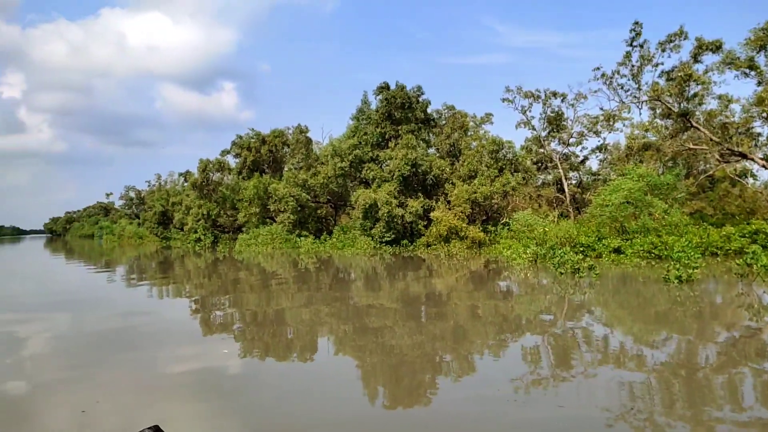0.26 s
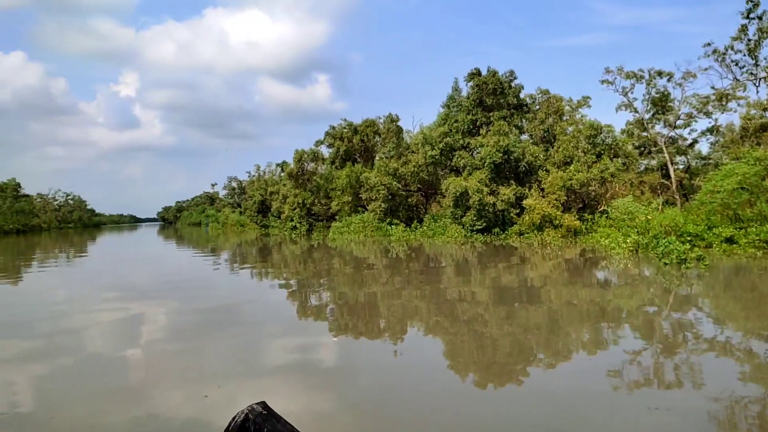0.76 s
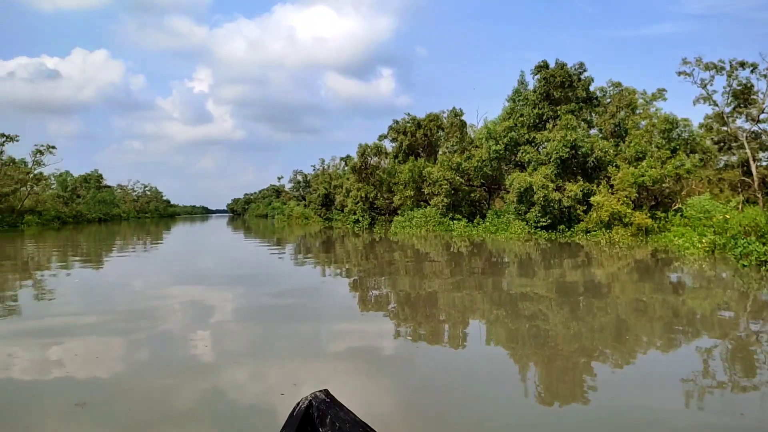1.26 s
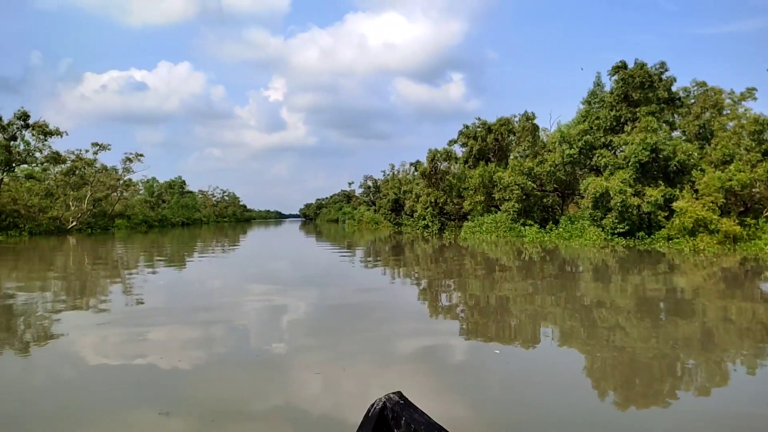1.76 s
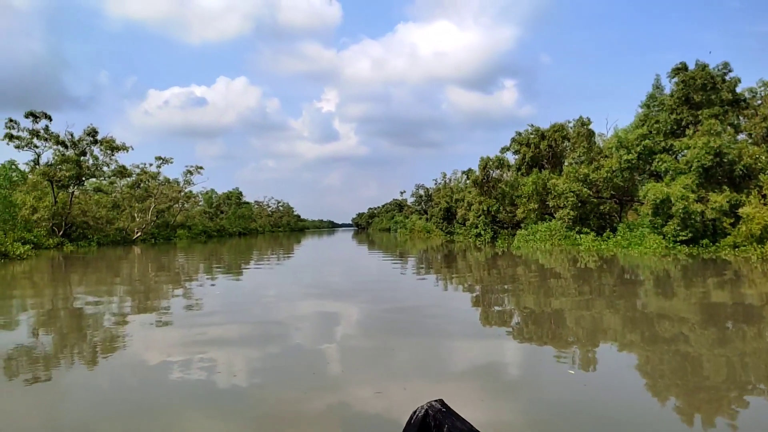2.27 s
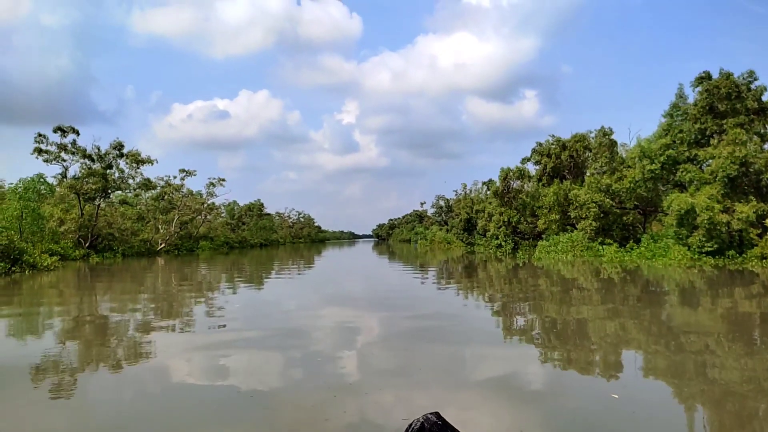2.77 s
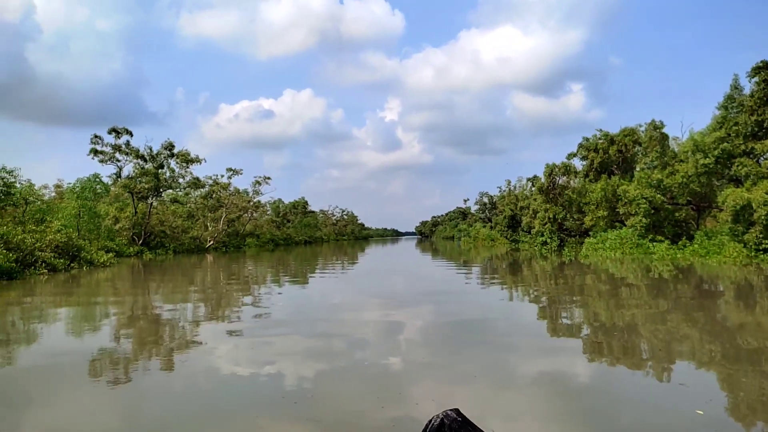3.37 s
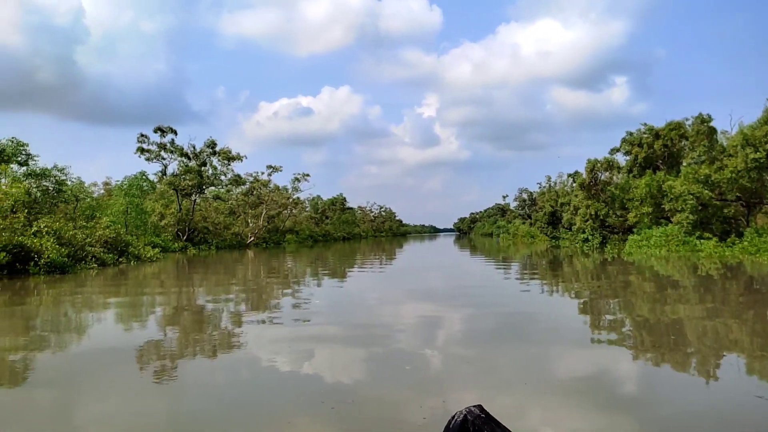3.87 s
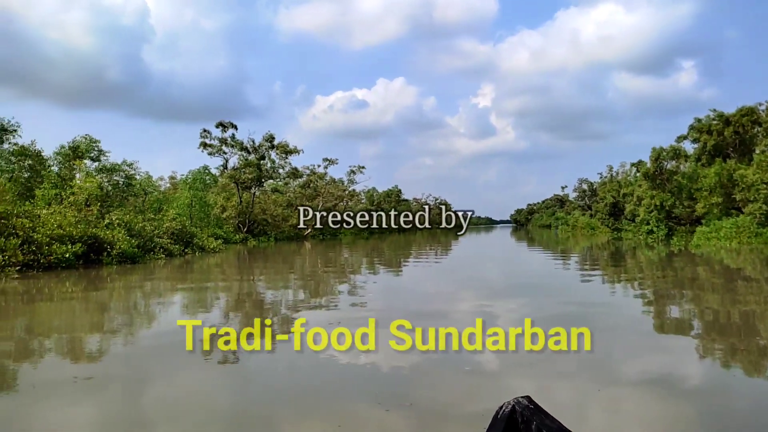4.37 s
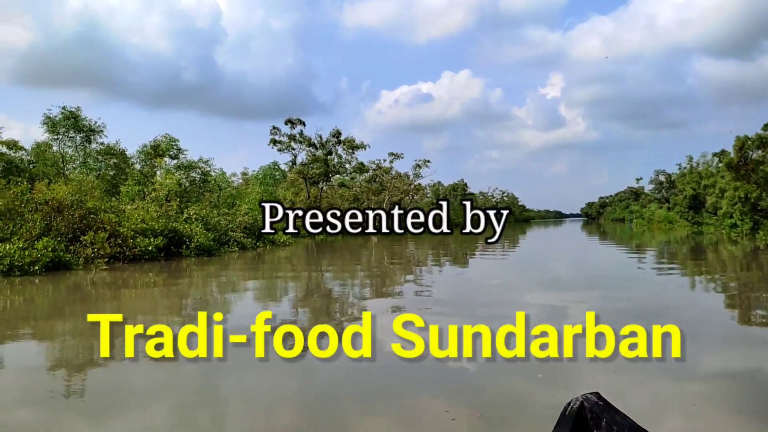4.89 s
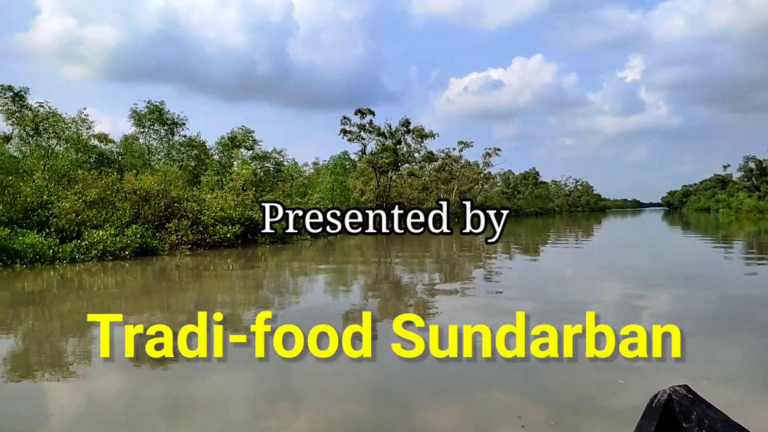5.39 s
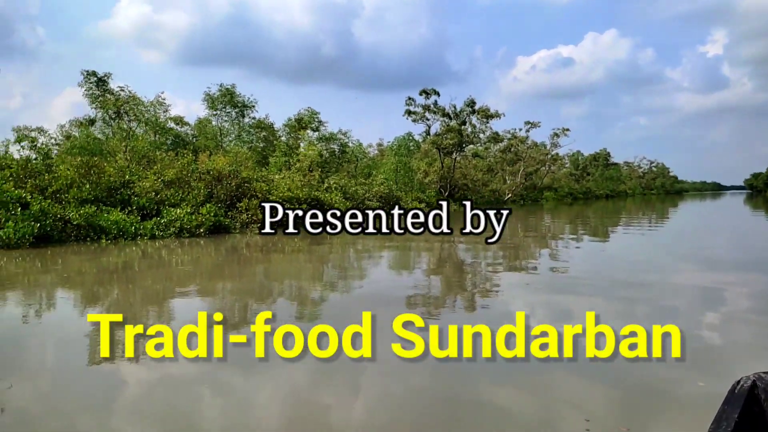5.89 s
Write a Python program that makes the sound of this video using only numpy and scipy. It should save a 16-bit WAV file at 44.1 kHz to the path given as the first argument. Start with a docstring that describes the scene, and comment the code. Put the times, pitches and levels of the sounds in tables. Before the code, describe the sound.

A phone held in a small wooden boat picks up dull rumbling flow and soft lapping beneath everything. Early drops ring, one strong woody thud comes at two seconds with bubbling behind the oar, then several knocks tumble together at three. The water settles while distant birds whistle and chatter, and dry insect ticks come in short bouts. Softer double thumps close the scene, outdoors with light echo from the trees.

```python
"""Oars knock the planks of a wooden rowboat on a quiet mangrove creek, heard from a phone inside the hull.
Each knock is a set of hull modes that throw short packets and ring on, with a slap of noise at the contact.
Water along the hull is patchy filtered noise; gurgles and drips are ringing bubbles of rising pitch.
Birds call from both banks as gliding sines with echoes; insects tick, hiss and buzz, all shaped noise."""
import sys
import numpy as np
from scipy import signal
from scipy.fft import rfft, irfft, next_fast_len
from scipy.io import wavfile
from scipy.ndimage import uniform_filter1d, map_coordinates

SR = 44100
rng = np.random.default_rng(int(sys.argv[2]) if len(sys.argv) > 2 else 0)


def to_wav(sig):
    """Store sig (one row per channel, or 1-D mono) as 16-bit WAV at the path in sys.argv[1].

    Samples outside -1..1 are clipped; the rate is SR.
    """
    pcm = np.clip(np.atleast_2d(sig), -1, 1) * 32767
    pcm = np.round(pcm).astype(np.int16)
    wavfile.write(sys.argv[1], SR, pcm.T)  # frames by channels


N = 270774

# Places where the oar meets the hull, named by the blows. Columns: drive of the modes of
# keel_db, belly_db, thwart_db, plank_db, rail_db, edge_db
GUNWALE = (-2.5, -11.5, -26, -1, -22.5, -22.5)
RIB = (-2.5, -4, -3, -7.5, -18.5, -33)
SIDE = (-14.5, -0.5, -11.5, -12.5, -31, -47)
SEAT = (-8, 2.5, -0.5, -11.5, -34.5, -33)
# Hiss and chatter wash from the banks, relative levels. Columns: time_s, insect_chorus_db, chatter_wash_db
HISS = [(0.0, -70, -59), (0.27, -70.5, -85), (1.06, -71, -85), (1.32, -64, -78.5), (2.22, -72, -80),
        (2.74, -71, -66.5), (2.94, -74.5, -76), (3.38, -72.5, -83), (3.64, -69, -63.5), (4.1, -73, -68.5),
        (6.14, -67.5, -83.5)]


def amp(db):
    """Decibels to a linear gain."""
    return 10 ** (np.asarray(db) / 20)


def unit(x):
    """Scale a signal to an rms of 1."""
    return x / np.sqrt(np.mean(x ** 2) + 1e-20)


def curves(rows):
    """One value per sample for each column after the time."""
    s, *cols = np.transpose(rows)
    return [np.interp(np.arange(N) / SR, s, c) for c in cols]


def wobble(rate):
    """A smooth random curve, rate knots a second."""
    return map_coordinates(rng.standard_normal(int(N * rate / SR) + 4), [np.arange(N) * rate / SR])


def swells(rows, rise_s, fade_s):
    """Gain of (start_s, hold_s, level_db) rows: each rises, holds and fades by 60 dB in fade_s."""
    t = np.arange(N) / SR
    total = np.zeros(N)
    for start, hold, db in rows:
        rise = np.clip(1 + (t - start) / rise_s, 0, 1) ** 2  # full at start
        total += rise * amp(db - 60 * np.maximum(t - start - hold, 0) / fade_s)
    return total


def filtered(x, response):
    """x times a response of frequency."""
    m = next_fast_len(N + SR // 2)
    return irfft(rfft(x, m) * response(np.fft.rfftfreq(m, 1 / SR)), m)[..., :N]


def rush(spectrum, patchy_db):
    """Noise of rms 1, shaped by (Hz, relative dB) rows, with patches of random gain in time and pitch."""
    z = signal.stft(rng.standard_normal(N), nperseg=512)[2]
    field = uniform_filter1d(uniform_filter1d(rng.standard_normal(z.shape), 5, 0), 10, 1)
    noise = signal.istft(z * amp(patchy_db * unit(field)), nperseg=512)[1][:N]
    f, db = np.transpose(spectrum)
    return unit(filtered(noise, lambda hz: amp(np.interp(np.log(hz + 1), np.log(f), db, -120, -120))))


def add(track, s, sound):
    """Mix a sound in at time s."""
    part = track[max(round(s * SR), 0):][:len(sound)]
    part += sound[:len(part)]


def tone(hz, gain):
    """A sine that follows a pitch curve."""
    return gain * np.sin(2 * np.pi * np.cumsum(hz) / SR)


def bubble(hz, cycles, rise):
    """An air pocket rings briefly while its pitch climbs."""
    u = np.arange(int(4 * cycles * SR / hz)) * hz / SR / cycles
    return tone(hz * (1 + rise * u), np.exp(-1.6 * u) * (1 - np.exp(-14 * u)))


def chatter_wash():
    """Chatter echoing off the banks, as a narrow band of patchy noise."""
    wash_db = curves(HISS)[1]
    return amp(wash_db - 7) * rush([(3500, -14), (4000, -1), (4500, .3), (4900, -18)], patchy_db=2.5)


def chatter_blur():
    """Many short rising strokes that blur together, at a level that follows the chatter wash."""
    out, u = np.zeros(N), np.linspace(0, 1, SR // 45)
    for when, pitch, size in rng.random((450, 3)):
        from_hz = 2800 + 1350 * pitch ** .4
        add(out, when * N / SR, tone(from_hz + 450 * u, amp(7.1 * size) * np.sin(np.pi * u)))
    return amp(curves(HISS)[1] - 5) * unit(out)


def insect_chorus():
    """A high, narrow insect hiss with a restless level."""
    chorus_db = curves(HISS)[0] + 1.2 * wobble(50)
    return amp(chorus_db) * rush([(5600, -16), (6000, 0), (7000, .3), (7700, -2)], patchy_db=1.5)


def tick_list():
    """Single insect ticks, and bouts of ticking at an uneven pace: (start_s, level_db)."""
    # Single insect ticks, levels relative. Columns: start_s, level_db
    single = [(0.009, -45), (0.0319, -51.5), (0.048, -47.5), (0.062, -45), (0.1311, -41.5), (0.1511, -47),
              (0.19, -36), (0.2047, -43.5), (0.6215, -43), (0.6401, -46.5), (0.6818, -51), (0.6978, -46),
              (0.7442, -53.5), (0.7572, -47.5), (0.7741, -47), (1.2625, -45), (1.284, -47.5),
              (1.3084, -53.5), (1.3508, -58.5), (1.381, -44.5), (1.6829, -52.5), (1.734, -42),
              (1.8242, -46.5), (1.966, -45.5), (2.6719, -54), (2.71, -54.5), (2.7257, -46), (2.795, -49.5),
              (2.8064, -50.5), (3.3837, -54.5), (3.4044, -47.5), (3.4427, -46), (3.4735, -49.5),
              (3.501, -52), (4.1668, -53), (4.1984, -50.5), (4.2172, -48.5), (4.2448, -50), (4.2757, -50),
              (4.2862, -47), (4.758, -43), (5.0936, -44), (5.5762, -53.5), (5.5962, -51), (5.6266, -54),
              (5.679, -43), (5.6907, -46.5)]
    # Bouts of ticking, levels relative. Columns: start_s, length_s, level_db
    bouts = [(0, 0.23, -47), (0.623, 0.14, -49), (1.236, .15, -47), (1.67, .15, -51), (1.922, .15, -52),
             (2.661, .16, -54), (3.377, .14, -46.5), (4.156, .14, -48), (4.846, 0.16, -49),
             (5.533, .15, -47)]
    gap_s, scatter_db = .024, 0.5  # mean gap in a bout, spread of level either way
    in_bouts = []
    for start, length, db in bouts:
        for k, (when, size) in enumerate(rng.random((12, 2))):
            if k * gap_s < length:
                in_bouts.append((start + (k + when) * gap_s, db + scatter_db * (2 * size - 1)))
    return list(single) + in_bouts


def insect_ticks():
    """Each tick is a fast-fading puff of noise through a high mode and a weaker lower one."""
    out, t = np.zeros(N), np.arange(SR // 40) / SR
    high_mode = signal.butter(1, [5700, 7500], "bandpass", fs=SR, output="sos")
    low_mode = signal.butter(1, [4300, 5500], "bandpass", fs=SR, output="sos")
    fade = amp(-60 * t / 0.0014) + amp(2.5 - 60 * t / 0.023)
    for s, db in tick_list():
        puff = rng.standard_normal((2, len(t))) * fade
        high = signal.sosfilt(high_mode, puff[0])
        low = signal.sosfilt(low_mode, puff[1])
        add(out, s - .0005, amp(db) * (high + amp(-20) * low))
    return out


def insect_buzz():
    """A pulsed insect buzz: noise in two bands, about 75 pulses a second."""
    # The buzzes. Columns: start_s, hold_s, level_db
    buzzes = [(.3, 0.34, -61.5), (1.3, .16, -60.5)]
    pulse_hz = 75 + 6 * wobble(10)
    pulse = (.5 + .5 * np.sin(2 * np.pi * np.cumsum(pulse_hz) / SR)) ** .8
    noise = rush([(1250, -27.5), (1480, -2.5), (1750, -15), (2050, 0.0), (2400, -10)], patchy_db=0.5)
    return swells(buzzes, rise_s=0.039, fade_s=0.45) * unit(pulse * noise)


def warbler():
    """Sines that climb steeply to a held top, and others that fall and level out."""
    # Rising notes, levels relative. Columns: start_s, top_hz, level_db
    hooks = [(0.379, 3850, -54), (0.537, 3740, -54), (0.583, 3425, -49), (0.965, 3880, -49.5),
             (1.015, 3484, -47.5), (1.12, 3830, -52.5), (1.199, 3360, -48.5), (1.528, 3780, -51.5),
             (1.611, 3400, -51), (1.688, 3780, -54), (1.949, 3370, -54.5), (2.124, 3770, -57),
             (2.492, 3820, -59.5), (2.653, 3800, -59.5), (2.883, 3500, -61.5), (3.085, 3830, -60),
             (3.286, 3480, -61.5), (3.508, 3850, -54.5), (3.734, 3390, -56), (4.033, 3360, -56.5),
             (4.104, 3850, -56), (4.266, 3480, -52.5), (4.794, 3830, -55), (4.849, 3450, -46),
             (5.255, 3460, -48.5), (5.355, 3870, -51.5), (5.652, 3380, -50), (5.76, 3820, -50.5),
             (5.955, 3350, -55)]
    # Loudness along a rising note. Columns: time_s, level_db
    hook_shape = [(0, -7), (.012, -4), (.022, 0), (.031, -1), (.039, -17)]
    # Level of the climb, by the note's place in the scene. Columns: start_s, level_db
    climb_level = [(3.4, 0), (3.5, -9)]
    # Falling notes. Columns: start_s, level_db
    dips = [(.559, -60), (.992, -56), (1.174, -51.5), (1.591, -52.5), (1.929, -52.5), (2.174, -55),
            (2.86, -62), (3.266, -62), (4.243, -59)]
    out = np.zeros(N)
    s, shape_db = np.transpose(hook_shape)
    t = np.arange(int(s[-1] * SR)) / SR
    below = 1e5 * np.maximum(.019 - t, 0)  # Hz under the top
    edges = signal.windows.tukey(len(t), .2)
    for start, top_hz, db in hooks:
        hz = top_hz - uniform_filter1d(below, size=520, mode="nearest")
        climb_db = np.interp(start, *np.transpose(climb_level)) * np.clip(below / 500, 0, 1)
        gain = amp(db + 2.5 + climb_db + np.interp(t, s, shape_db)) * edges
        add(out, start, tone(hz, gain * np.clip((hz - 2050) / 200, 0, 1)))  # silent under 2050 Hz
    u = np.linspace(0, 1, int(0.029 * SR))
    for start, db in dips:
        add(out, start, tone(2150 + 1350 * (1 - u) ** 1.6, amp(db) * np.sin(np.pi * u) ** 0.11))
    return out


def chatter_strokes():
    """The chatter spelled out as rising glides: (start_s, length_s, from_hz, to_hz, level_db)."""
    # Chattering bird, one row a syllable. Columns: start_s, upper_voice_db, lower_voice_db, last_stroke_top_hz
    syllables = [(3.565, -61, -63, 2800), (3.689, -59, -56.5, 3160), (3.822, -62, -60, 3200),
                 (3.976, -65, -56, 3400), (4.124, -68, -54, 3700), (4.285, -69, -54.5, 3940),
                 (4.444, -78, -55, 4050), (4.604, -78, -55, 4000), (4.781, -70, -54, 3630)]
    # Strokes of the upper voice, levels relative. Columns: delay_s, length_s, from_hz, to_hz, level_db
    upper = [(0, .018, 3810, 4530, -3), (.021, .024, 3910, 4530, 4.5)]
    # First stroke of the lower voice, level relative. Columns: delay_s, length_s, from_hz, to_hz, level_db
    lower = [(.004, .024, 3177, 3676, 0)]
    last_delay_s, last_from_hz, last_hz_per_s = .031, 2500, 36000
    rows = []
    for s, upper_db, lower_db, top_hz in syllables:
        last = (last_delay_s, (top_hz - last_from_hz) / last_hz_per_s, last_from_hz, top_hz, 0)
        for voice, db in ((upper, upper_db), (lower + [last], lower_db)):
            for delay, length, from_hz, to_hz, part_db in voice:
                rows.append((s + delay, length, from_hz, to_hz, db + part_db))
    return rows


def glides(rows):
    """Whistled sines from one pitch to another, with soft ends."""
    out = np.zeros(N)
    for start, length, from_hz, to_hz, db in rows:
        u = np.linspace(0, 1, int(length * SR))
        bend = 1 - (1 - u) ** 2.2 if from_hz > 1.2 * to_hz else u  # wide falls level out at the end
        hz = from_hz + (to_hz - from_hz) * bend
        add(out, start, tone(hz, amp(db) * np.sin(np.pi * u) ** 0.41))
    return out


def chattering_bird():
    """Rising strokes, each trailed by a weaker, lower voice."""
    rows = chatter_strokes()
    out = glides(rows)
    for start, length, from_hz, to_hz, db in rows:
        u = np.linspace(0, 1, int(length * SR))
        trail = amp(db - 7) * np.sin(np.pi * u)
        add(out, start + 0.024, tone(.86 * (from_hz + (to_hz - from_hz) * u), trail))
    return out


def other_birds():
    """Single glides of other birds."""
    # Glides. Columns: start_s, length_s, from_hz, to_hz, level_db
    single = [(0, .041, 4970, 3770, -60), (.108, 0.019, 6080, 6970, -57), (0.157, 0.018, 7400, 7000, -52),
              (1.1, 0.03, 6340, 7070, -57.5), (1.17, 0.033, 6820, 6350, -55),
              (1.192, 0.036, 6270, 6220, -59.5), (1.397, 0.043, 6950, 6600, -62),
              (1.432, 0.027, 6630, 6490, -52.5), (1.903, 0.077, 5980, 4800, -67.5),
              (3.62, .062, 6950, 6420, -59.5), (3.678, .066, 6500, 5800, -57.5),
              (4.657, 0.023, 3500, 2910, -52), (4.966, 0.035, 3610, 3790, -53.5),
              (4.967, 0.023, 3330, 2800, -51.5), (5.042, 0.04, 2550, 2290, -57),
              (5.246, 0.022, 4300, 2830, -59), (5.247, .024, 2190, 2290, -52.5),
              (5.351, 0.022, 2360, 2490, -54.5), (5.48, 0.051, 4800, 3200, -66),
              (5.536, 0.055, 4750, 2900, -57.5), (5.64, 0.024, 2330, 2250, -47.5),
              (5.934, 0.01, 1364, 1704, -44), (5.937, 0.039, 2650, 2140, -53.5)]
    return glides(single)


def reedy_bird():
    """Arched calls built of a pitch and its multiples, the second strongest."""
    # Calls, levels relative. Columns: start_s, level_db, extra_db of the multiples above the second
    squeaks = [(2.178, -45.5, 3), (5.857, -44, 6)]
    # Course of a call before smoothing. Columns: time_s, pitch_hz, level_db
    arch = [(0, 1284, -4), (.01, 1780, -8), (0.016, 1766, -5.5), (.032, 1769, 0), (.05, 1350, -7.5),
            (.06, 1040, -11)]
    # Partials. Columns: multiple of the pitch, level_db
    reed = [(1, -5), (2, 2), (3, -11.5), (4, -15)]
    out = np.zeros(N)
    s, pitch, shape_db = np.transpose(arch)
    t = np.arange(int(s[-1] * SR)) / SR
    hz = uniform_filter1d(np.interp(t, s, pitch), size=300, mode="nearest")
    fall = np.maximum(t - .03, 0)  # from here all partials but the second fade further
    for start, db, high_db in squeaks:
        for k, part_db in reed:
            level_db = db + part_db + high_db * (k > 2) + np.interp(t, s, shape_db)
            gain = amp(level_db - 620 * abs(k - 2) * fall)
            add(out, start, tone(k * hz, gain * signal.windows.tukey(len(t), .15)))
    return out


def creek(x, t60, wet_db):
    """The banks answer with a few smeared echoes inside a fading wash."""
    # Tree-line echoes. Columns: delay_s, level_db
    banks = [(0.043, -22), (0.095, -21)]
    t = np.arange(SR // 2) / SR
    shape = amp(-11 - 60 * t / t60)
    for s, db in banks:
        shape = shape + amp(db) * np.exp(-((t - s) / 0.00049) ** 2)
    tail = rng.standard_normal(len(t)) * shape
    return x + amp(wet_db) * signal.fftconvolve(x, tail / np.linalg.norm(tail))[:N]


def hull_flow():
    """Flow drums the hull in lumps, laps and ripples, sharing one slow surge."""
    # Water along the hull, mean levels. Columns: time_s, rumble_db, lapping_db
    flow = [(0, -35.5, -39.5), (.3, -36, -43.5), (.55, -40, -43), (.9, -39, -45.5), (1.3, -39, -44.5),
            (1.9, -40, -45.5), (2.15, -45.5, -47), (2.85, -43.5, -47), (3.6, -39.5, -47.5), (4.6, -42, -47),
            (4.95, -43, -43), (5.3, -40, -47.5), (5.7, -40.5, -43.5), (6.14, -38, -46.5)]
    # Spectrum of the rumble. Columns: frequency_hz, relative level_db per Hz
    rumble = [(15, -55.5), (25, -25.5), (41, -11), (65, 3), (216, -12), (250, -28.5), (320, -49.5),
              (550, -120)]
    # Spectrum of the lapping. Columns: frequency_hz, relative level_db per Hz
    lapping = [(100, -33), (180, 7), (280, 4), (400, -3), (650, -8.5), (1000, -15.5), (1800, -23),
               (3000, -36.5)]
    # Spectrum of the ripples. Columns: frequency_hz, relative level_db per Hz
    ripple = [(700, -5), (1300, 2), (2200, 0.5), (3500, -4), (4200, -17), (5600, -14.5), (7700, -35)]
    rumble_db, lap_db = curves(flow)
    surge = wobble(15)
    out = amp(rumble_db + 2.64 * surge + 0.29 * wobble(9.0)) * rush(rumble, patchy_db=-0.24)
    out += amp(lap_db + .9 * surge + 1.3 * wobble(40)) * rush(lapping, patchy_db=1.2)
    ripple_db = -63 + 0.5 * wobble(3.396) + 0.59 * surge + 2.56 * wobble(60)
    return out + amp(ripple_db) * rush(ripple, patchy_db=3.2)


def gurgles():
    """A crowd of small bubbles over low noise, always faintly there, swells behind the blade."""
    # Gurgles behind the blade, relative levels. Columns: start_s, hold_s, level_db
    bursts = [(2.2, 0.16, -40.5), (2.37, 0.015, -44), (5.04, 0.018, -45.5)]
    froth = np.zeros(N)
    for when, pitch, size in rng.random((2500, 3)):
        ring = bubble(230 * 5 ** pitch ** 1.3, 5, .12) / (1 + 3 * pitch)  # high ones are weaker
        add(froth, when * N / SR, amp(12 * size ** 3) * ring)
    wash = rush([(200, -1.5), (500, -2.5), (900, -9), (2000, -25)], patchy_db=1)
    gain = amp(-59) + swells(bursts, rise_s=0.01, fade_s=0.73)
    return gain * (unit(froth) + amp(-7) * wash)


def drips():
    """Single drops, each a ringing bubble."""
    # Drops, all played 3 dB lower and at 0.9 of pitch_hz.
    # Columns: start_s, level_db, pitch_hz, cycles, pitch rise
    drops = [(.087, -36, 2380, 7.2, 0.044), (0.104, -30.5, 1320, 5, 0.079), (0.103, -30, 850, 5.3, 0.1),
             (0.172, -27.5, 649, 8.2, 0.092), (0.546, -23, 990, 3.8, 0.082), (2.185, -47, 560, 6.6, 0.083),
             (2.257, -37, 863, 5.5, 0.14), (2.336, -33, 726, 11, 0.065), (2.374, -30, 730, 15, 0.12),
             (2.564, -37, 805, 5.5, 0.11), (2.641, -27, 727, 6.3, 0.12), (2.725, -31.5, 950, 4.4, 0.085),
             (3.277, -37.5, 1570, 6.4, 0.11), (4.893, -37, 1000, 4.6, 0.14)]
    out = np.zeros(N)
    for s, db, hz, cycles, rise in drops:
        add(out, s, amp(db - 3.0) * bubble(hz * .9, cycles, rise))
    return out


def oars():
    """Bending waves run along the planks, high ones first; each mode throws a short packet, then rings on weakly."""
    # Oar blows and rebounds, relative levels. Columns: start_s, contact length factor, level_db, place, hardness_db
    blows = [(0.286, 0.59, -29, RIB, -22), (0.642, 1.3, -34, GUNWALE, 7),
             (1.9687, 1.15, -1.5, GUNWALE, -2.5), (2.019, 1.33, -15.5, SIDE, 14),
             (3.033, 1.2, -0.5, SIDE, 0), (3.047, 1.095, -4.5, SIDE, -2), (3.07, 0.84, -27, RIB, 4.5),
             (3.131, 1.36, -8.5, SIDE, -5), (3.19, 1.17, -10.5, RIB, -6), (3.227, 0.98, -21, RIB, -10),
             (3.357, 1.68, -17, SIDE, 30), (3.38, 1.31, -12.5, SIDE, 17), (3.413, 1.3, -14.5, RIB, -14),
             (4.252, 1.44, -30, SEAT, -6), (5.065, 1.2, -35.5, SIDE, 27), (5.501, 1.57, -22, SEAT, -15),
             (5.766, 1.12, -13, SEAT, 7), (5.788, 1.1, -14.5, SEAT, 0), (5.817, 1.18, -14.5, RIB, -16),
             (5.832, 1.2, -26, GUNWALE, 10.5), (5.85, 1.02, -22, RIB, -6)]
    # Share of a blow's hardness that reaches each group. Columns: keel, belly, thwart, plank, rail, edge
    hard_share = (0.17, 0.059, 0.25, 0.42, 0.73, 1.23)
    # Hull modes, low to high groups. Columns of all six: frequency_hz, level_db, t60_s
    keel = [(98.8, 3, 0.21), (115.4, 4, 0.38)]
    belly = [(135.04, 0.5, 0.34), (149.96, 1.5, 0.3)]
    thwart = [(165.8, 0.01, 0.047)]
    plank = [(235.5, -5, 0.048), (252.5, 3.5, 0.22), (275.3, -1.5, 0.14)]
    rail = [(346, -9, 0.11), (474, -0.5, 0.39), (557, -0.5, 0.25), (574, -1, 0.55), (673.4, -6.5, 0.06)]
    edge = [(836, -11.5, 0.09), (1036, -7.5, 0.063), (1308, -17, .06), (1620, -21, 0.03)]
    # Spectrum of the contact noise. Columns: frequency_hz, relative level_db per Hz
    slap = [(300, -23), (700, 23.5), (1500, -9), (3000, -16.5), (6000, -32), (7700, -32.5)]
    out, slaps, t = np.zeros(N), np.zeros(N), np.arange(SR // 3) / SR
    for s, contact, blow_db, place, hard_db in blows:
        levels = blow_db + np.array(place) + hard_db * np.array(hard_share)
        for modes, db in zip((keel, belly, thwart, plank, rail, edge), levels):
            for hz, mode_db, t60 in modes:
                late = np.maximum(t - 0.01 / np.sqrt(hz), 0)  # time since this mode arrived
                u = late * hz ** 0.456 / (.25 * contact)
                packet = 1.8 * u ** 1.4 * np.exp(-u ** 4.5)
                ring = amp(-14 - 60 * late / t60) * (1 - np.exp(-3 * u))
                # random phase drift roughens the high modes
                drift = np.cumsum(rng.standard_normal(len(t))) * (hz / 1000) ** 1.2 * .08
                phase = 2 * np.pi * hz * late + uniform_filter1d(drift, size=150)
                gain = amp(db + mode_db + rng.normal(0, 0.11))
                add(out, s, gain * (packet + ring) * np.sin(phase))
        # the slap follows the drive of the edge modes
        add(slaps, s, amp(levels[-1] - 3.5 - 60 * t / 0.16) * (1 - np.exp(-t / 0.0054)))
    return out + slaps * rush(slap, patchy_db=-5.5)


def scene():
    """Bird calls ring between the banks; chatter wash, insects, water and oars get no further echo."""
    birds = chatter_blur() + warbler() + chattering_bird() + other_birds() + reedy_bird()
    background = chatter_wash() + insect_chorus() + insect_ticks() + insect_buzz()
    water = hull_flow() + gurgles() + drips()
    return (background + creek(birds, t60=0.6, wet_db=-5.5) + water + oars())[None]


def record(dry):
    """The microphone path drops deep bass and all treble above mic_hz, then clips peaks, over a faint hiss."""
    mic_hz, top_hz, bass_hz = 7620, 15500, 45  # limit of the scene, limit of the hiss, bass corner
    x = filtered(dry, lambda hz: (hz < mic_hz) * (1j * hz / (bass_hz + 1j * hz)) ** 2)
    x = np.clip(x, -.96, .96)
    x = x + amp(-83.0) * rng.standard_normal(x.shape)
    return filtered(x, lambda hz: hz < top_hz)


dry = scene()
out = record(dry)
to_wav(out)
```